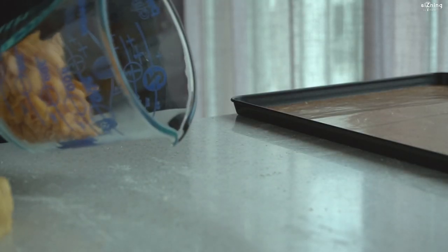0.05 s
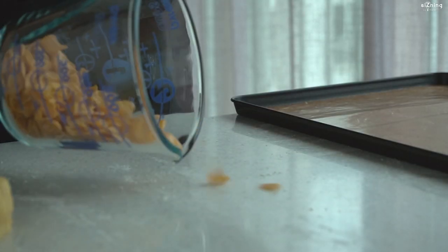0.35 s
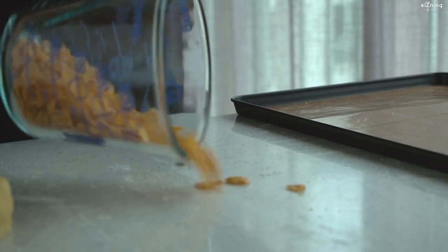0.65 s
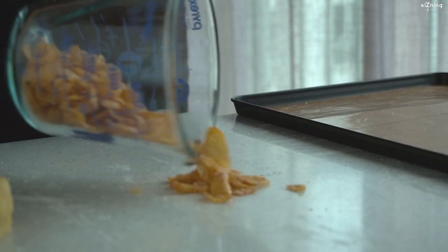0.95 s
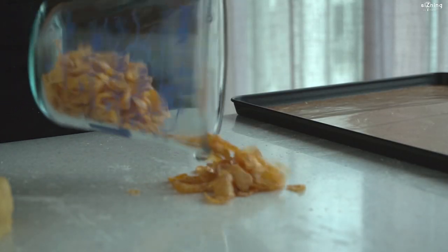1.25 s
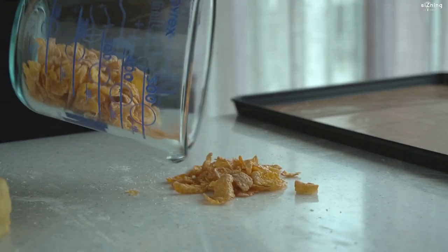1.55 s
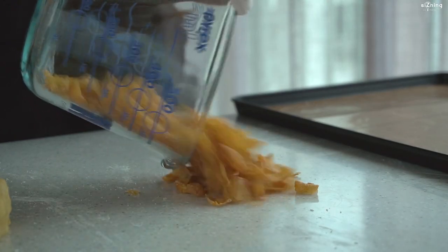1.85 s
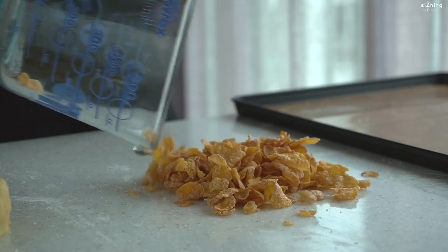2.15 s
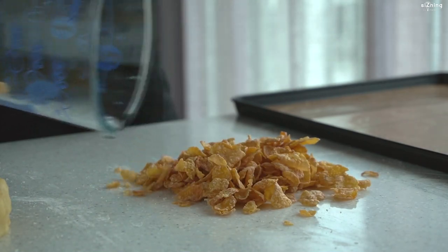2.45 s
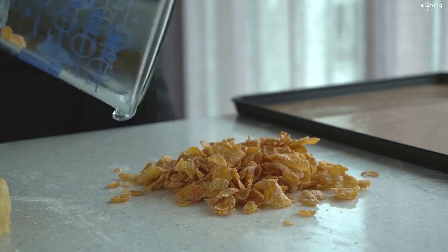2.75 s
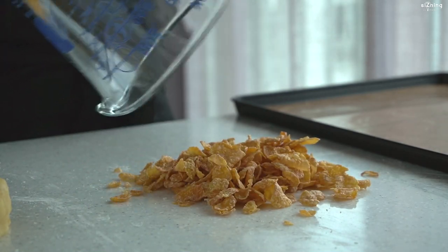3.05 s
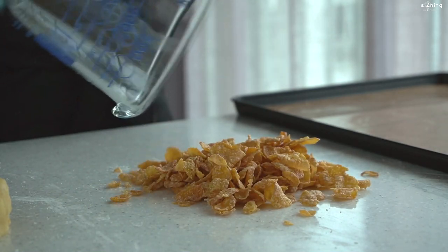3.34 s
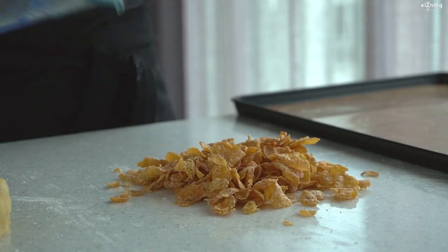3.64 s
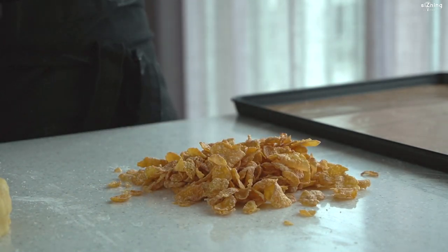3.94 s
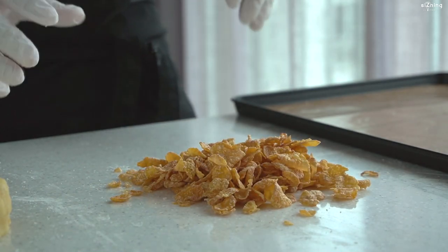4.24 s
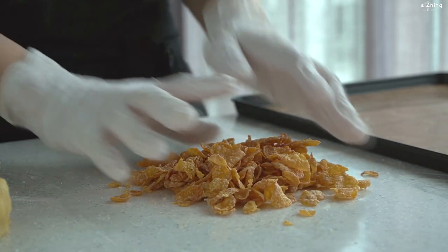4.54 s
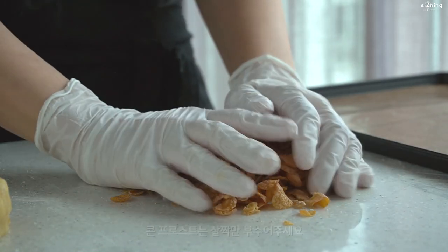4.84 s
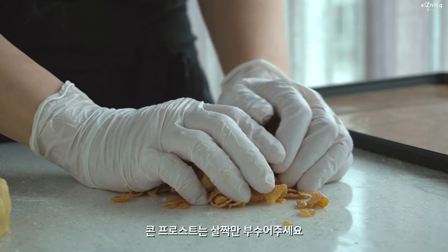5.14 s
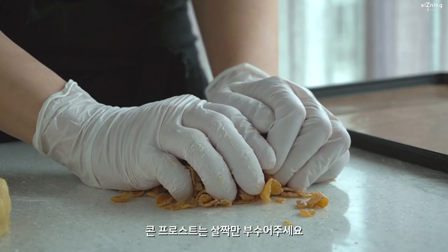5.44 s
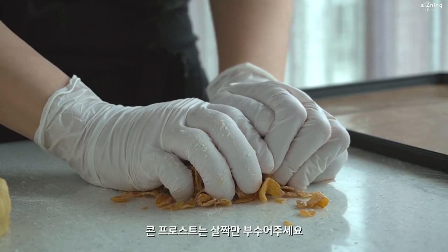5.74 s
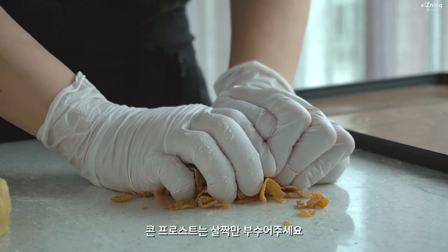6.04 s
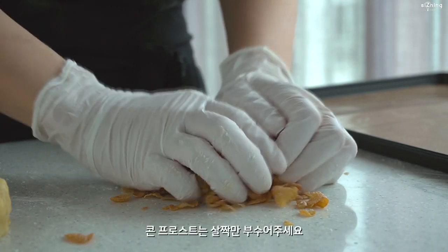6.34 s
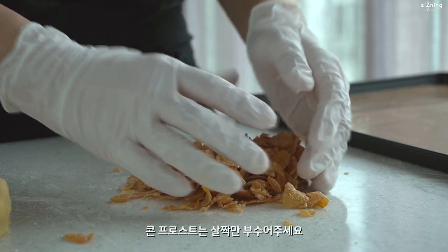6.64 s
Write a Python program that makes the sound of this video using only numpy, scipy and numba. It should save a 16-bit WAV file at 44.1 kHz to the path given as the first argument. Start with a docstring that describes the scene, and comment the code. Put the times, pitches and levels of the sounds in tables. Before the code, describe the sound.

Dry cornflakes trickle from a glass jug onto a stone countertop in bright, tinkling spurts, lightly ringing the glass and ending in a fuller rush. A few last flakes bounce onto the heap. After a pause, gloved hands press down, and fine crackling builds into dense, slightly hollow crunching with soft thuds, then eases off. The sound is close, in a quiet, humming kitchen.

```python
"""Cornflakes tinkle and rush out of a glass jug onto a stone countertop; then two gloved hands cup the
heap and crush it. Every contact or fracture is the tiny ring of a brittle flake. Sliding flakes ring
the glass; breaking ones ring the air pocket under the palms and thud into the counter.
Close stereo perspective in a quiet, humming kitchen."""
import sys
import numpy as np
from scipy import signal
from scipy.fft import rfft, irfft, next_fast_len
from scipy.io import wavfile
from scipy.ndimage import uniform_filter1d
from numba import njit

SR = 44100
rng = np.random.default_rng(int(sys.argv[2]) if len(sys.argv) > 2 else 0)


def int16_out(signal):
    """Quantize to a 16-bit WAV file."""
    q = np.round(np.clip(np.atleast_2d(signal).T, -1, 1) * 32767)
    wavfile.write(sys.argv[1], SR, q.astype(np.int16))


N = 299439
T = np.arange(N) / SR
TOP_HZ = 16000


def undb(db):
    """Decibels to gain."""
    return 10 ** (np.asarray(db) / 20)


def fader(points):
    """Gain that follows (time_s, level_db) points; silent outside their span."""
    return undb(np.interp(T, *np.transpose(points), left=-140, right=-140))


def swells(table, fall_db_per_s):
    """Gain of overlapping events that each build up, hold and die away; their powers add."""
    power = 0
    for peak_s, rise_s, hold_s, db in table:
        attack = np.exp(np.minimum(T - peak_s, 0) / max(rise_s, .001))
        fall_db = fall_db_per_s * np.clip(T - peak_s - hold_s, 0, 1)
        power = power + (attack * undb(db - fall_db)) ** 2
    return np.sqrt(power)


def unit(x):
    """Scale to rms 1."""
    return x / np.sqrt(np.mean(x ** 2))


def colour(x, points, size=1024):
    """Minimum-phase EQ shaped by (freq_hz, gain_db) points; white noise keeps its power."""
    hz, db = np.transpose(points)
    grid_hz = np.maximum(np.fft.rfftfreq(size, 1 / SR), 1)
    gain = undb(np.interp(np.log(grid_hz), np.log(hz), db))
    cepstrum = irfft(np.log(gain))
    cepstrum[1:size // 2] *= 2
    cepstrum[size // 2 + 1:] = 0
    taps = irfft(np.exp(rfft(cepstrum)))
    return signal.oaconvolve(x, taps[None] / np.linalg.norm(taps))[:, :N]


def ring(x, hz, width_hz):
    """One resonance, steady or gliding, as a complex signal."""
    radius = np.exp(-np.pi * width_hz / SR)
    gain = [np.sqrt(2 * (1 - radius ** 2))]
    if np.ndim(hz) == 0:
        return signal.lfilter(gain, [1, -radius * np.exp(2j * np.pi * hz / SR)], x)
    turn = np.exp(2j * np.pi * np.cumsum(hz) / SR)
    return turn * signal.lfilter(gain, [1, -radius], x / turn)


def steep_ring(x, hz, stage_width_hz):
    """Two equal resonances in series, for steeper skirts; rms 1."""
    once = ring(x, hz, stage_width_hz).real
    return unit(ring(once, hz, stage_width_hz).real)


def body(x, modes):
    """A set of resonances struck together, at the level of their drive."""
    return unit(sum(undb(db) * ring(x, hz, width).real for hz, width, db in modes)) * np.std(x)


@njit
def add_rings(out, start, omega, decay, size, lag):
    """Add damped sines to both channels, timed in samples; the left one lags by lag radians."""
    for k in range(len(start)):
        pole = np.exp(1j * omega[k] - 1 / decay[k])
        for c in range(2):
            z = size[k, c] * 2 / np.sqrt(decay[k]) * np.exp(1j * lag[k] * (c - .5))
            for i in range(start[k], min(start[k] + int(6 * decay[k]), out.shape[1])):
                out[c, i] += z.imag
                z *= pole


# Stereo image of a flake's ring: pitch_hz, left_lag_rad, scatter_rad, left_minus_right_db
FLAKE_IMAGE = [(0, 0.37, .05, 7.5), (2500, 0, 0.038, -0.5), (4200, 0, 0.067, -0.1), (5500, 0, 0.056, 1.5),
               (7600, 0.4, 1.4, 4), (9400, 0.15, 0.2, -2.5), (11500, 0.8, 0.3, 3), (14000, 0.9, 0.78, 0)]
def flakes(times, sizes, hz=None, ring_s=.00045, ring_spread=1.0):
    """Each brittle flake rings with its own pitch, damping and place; sizes are root energies."""
    damping, place, side = rng.standard_normal((len(times), 3)).T
    if hz is None:
        hz = rng.uniform(0, TOP_HZ, len(times))
    decay = SR * ring_s * np.exp(ring_spread * np.clip(damping, -2, 2))
    image_hz, *columns = np.transpose(FLAKE_IMAGE)
    lag, scatter, left_db = (np.interp(hz, image_hz, column) for column in columns)
    pan = undb(np.outer(left_db + 4 * side * scatter, [.5, -.5]))
    start = np.clip(times * SR, 0, N - 1).astype(np.int64)
    out = np.zeros((2, N))
    add_rings(out, start, 2 * np.pi * hz / SR, decay, sizes[:, None] * pan, lag + scatter * place)
    return out


def rustle(per_s, scatter_db, ring_s, scrape_s, dulling=0, edges=3, free_ring_hz=10000):
    """A bed of random contacts, each a short scrape over several edges; held steady at rms 1."""
    when, chance = rng.random((int(per_s * N / SR), 2)).T
    sizes = undb(-scatter_db * np.log(chance + .004))
    times = when[:, None] * N / SR + scrape_s * rng.exponential(1, (len(when), edges))
    hz = rng.uniform(0, TOP_HZ, times.size)
    # big, low flakes lie against their neighbours, which cuts their ring short
    freedom = np.clip(hz / free_ring_hz, .3, 1) ** dulling
    contacts = flakes(times.ravel(), np.repeat(sizes, edges), hz, ring_s=ring_s * freedom)
    power = uniform_filter1d(np.mean(contacts ** 2, axis=0), size=1500)
    return contacts / np.sqrt(power + 1e-12)


# Trickle while the jug is tipped: time_s, level_db
TRICKLE_FADER = [(0, -41), (.08, -37.5), (.52, -36.5), (.54, -47.5), (.66, -37), (1.0, -42.5),
                 (1.75, -37.5), (2.22, -39), (2.31, -60), (2.43, -64.5), (2.76, -76)]
# Batches give way, slide out and settle: peak_s, rise_s, hold_s, level_db
SLIDE_CUES = [(.14, 0.029, 0.012, -32), (.18, .008, 0.068, -28.5), (.36, 0.015, 0.011, -35.5),
              (.69, 0.03, 0.018, -27.5), (.81, .02, 0.047, -35.5), (.945, 0.03, 0.0059, -33),
              (1.04, 0.0066, 0.057, -35.5), (1.2, 0.014, 0.017, -30.5), (1.305, 0.0043, 0.016, -33.5),
              (1.545, .02, 0.061, -38.5), (1.622, 0.015, 0.023, -34), (1.82, 0.031, .18, -24),
              (2.06, 0.034, 0.012, -29), (2.18, .02, 0.011, -32.5), (3.08, 0.024, 0.026, -58)]
# The last flakes bounce on the heap, scattering crumbs: peak_s, rise_s, hold_s, level_db
BOUNCE_CUES = [(3.245, 0.0043, .008, -35.5), (3.288, 0.0062, 0.0093, -38.5), (3.35, .02, .01, -53)]
# The jug's lip rubs the counter and rings the glass: peak_s, rise_s, hold_s, level_db
LIP_RUB_CUES = [(.17, .03, .12, -37), (1.47, .03, 0.19, -40)]
# Ring of the glass jug: pitch_hz, width_hz, gain_db
JUG_MODES = [(738, 105, -2), (1328, 70, -0.5), (1760, 60, -3.5), (2278, 61, 1), (3680, 40, -5),
             (4900, 19, 3), (6648, 30, -24), (7050, 20, -8)]
# Thin, bright tone of loose flakes: freq_hz, gain_db
LOOSE_EQ = [(150, -36), (350, -15), (500, -24), (750, -19), (950, -19.5), (1900, -16), (2800, -12.5),
            (3700, -7.5), (5800, -6), (7400, -9.5), (9600, -2), (11200, -2.5), (13200, -7.5), (16000, -17)]
def pour(glass_db=-16.5, patter_db=-31):
    """Flakes tinkle one by one or rush together, knock the glass and patter on the counter."""
    moving = np.hypot(fader(TRICKLE_FADER), swells(SLIDE_CUES, fall_db_per_s=162))
    loudness = undb(-1) * moving + swells(BOUNCE_CUES, fall_db_per_s=450)
    rush = np.clip(loudness / undb(-27), .45, .9)  # a faster flow has many more contacts
    tinkle = rustle(per_s=900, scatter_db=2.2, ring_s=.0016, scrape_s=.0016, dulling=2)
    slide = rustle(per_s=7000, scatter_db=.5, ring_s=.00074, scrape_s=.002, dulling=1)
    flow = loudness * (np.sqrt(1 - rush) * tinkle + np.sqrt(rush) * slide)
    hits = rng.random(N) < 90 / SR  # about 90 a second
    knocks = unit(hits * undb(3 * rng.standard_normal(N)))
    in_jug = np.minimum(loudness, undb(-37)) * np.interp(T, [1.7, 1.9], [1, .3])
    on_glass = np.hypot(in_jug, swells(LIP_RUB_CUES, fall_db_per_s=162))
    patter = counter_thud(undb(patter_db) * moving * rng.standard_normal(N))
    return colour(flow, LOOSE_EQ) + patter + undb(glass_db) * body(knocks * on_glass, JUG_MODES)


# Low body of the stone slab: pitch_hz, width_hz, gain_db, left_lag_rad, left_minus_right_db
SLAB_MODES = [(100, 10, 0, 2.95, -0.5), (155.5, 13, -13.5, .4, -3), (199, 37, 2, 1.4, 5.5),
              (236, 22, -7.5, 1.76, -3), (293, 36, -13.5, .3, -8), (336, 27, -11.5, 0.55, -6),
              (386, 51, -16, 2.2, 0), (648, 180, -7.5, 0.68, 0.5)]
def counter_thud(force):
    """The slab's modes share the force; each has its own stereo phase and balance."""
    half = np.array([[.5], [-.5]])
    thud = 0
    for hz, width, db, lag, left_db in SLAB_MODES:
        mode = unit((ring(force, hz, width) * np.exp(-1j * lag * half)).real)
        thud = thud + undb(db + left_db * half) * mode
    band = signal.butter(2, [85, 900], "band", fs=SR, output="sos")
    return unit(signal.sosfilt(band, thud)) * np.std(force)


# Dark tone of the ventilation: freq_hz, gain_db
VENT_EQ = [(18, -1), (30, 0), (60, -3), (95, -15), (125, -16), (170, -13), (280, -16.5), (400, -17.5),
           (530, -18.5), (750, -24), (1000, -26.5), (2400, -33), (10000, -39), (16000, -42.5)]
# Bands of the appliance drone: pitch_hz, stage_half_width_hz, level_db
DRONE_BANDS = [(48.3, 7.4, -60), (85.57, 1.85, -57.5), (167.2, 7.7, -64.5), (224, 18.5, -62.5),
               (351.2, 30, -61)]
# The drone slowly swells and recedes: time_s, gain_db
DRONE_FADER = [(0, -4), (1.3, -2.5), (2.1, 0.5), (3.1, -0.5), (4.4, 1.5), (6.8, -2.5)]
def kitchen_hum(vent_db=-50, side_db=-3):
    """Room tone: soft ventilation noise, a touch wider in the treble, and a droning appliance."""
    mid, side = colour(rng.standard_normal((2, N)), VENT_EQ, size=8192)
    side = side - .046 * signal.sosfilt(signal.butter(1, 700, fs=SR, output="sos"), side)
    vent = mid + undb(side_db) * side * np.array([[1], [-1]])
    noise = rng.standard_normal(N)
    drone = sum(undb(db) * steep_ring(noise, hz, 2 * half_width) for hz, half_width, db in DRONE_BANDS)
    return undb(vent_db) * vent + drone * fader(DRONE_FADER)


# Single flakes strike or snap in the foreground; a glove snaps once: start_s, level_db, pitch_hz
TICK_CUES = [(0.066, -31.5, 9400), (0.104, -27, 10460), (.138, -27, 10600), (.179, -22, 10100),
             (.2023, -22, 10800), (.266, -25, 10500), (.323, -28.5, 9600), (.438, -30, 10000),
             (0.4847, -34, 11200), (.686, -34, 9500), (0.704, -27, 11800), (0.793, -29, 11800),
             (.816, -28, 11500), (0.9108, -26, 10800), (0.945, -27.5, 10600), (.9538, -26.5, 8330),
             (1.0362, -30.5, 10300), (1.183, -24.5, 11800), (1.2032, -30, 10200), (1.3023, -28, 8370),
             (1.338, -31, 10500), (1.4885, -35, 11500), (1.514, -28.5, 9000), (1.539, -29, 6640),
             (1.5484, -27, 14500), (1.6326, -31, 12100), (1.6454, -31, 12800), (1.777, -30.5, 10600),
             (2.054, -28.5, 6440), (2.267, -37, 11100), (2.3504, -45, 12800), (2.456, -54, 11500),
             (2.4875, -40, 10600), (2.4968, -38, 5770), (2.518, -39.5, 5570), (2.591, -44.5, 5960),
             (2.648, -53, 8750), (2.6934, -52, 4700), (3.1085, -50, 9400), (3.2238, -36, 11200),
             (3.238, -25, 5620), (3.251, -26.5, 10000), (3.29, -30.5, 12300), (3.301, -35.5, 5700),
             (3.646, -53.5, 5500), (4.432, -48.5, 4400), (4.652, -33, 11230), (4.748, -33, 11400),
             (5.5233, -26, 7070), (5.6937, -19, 10400), (6.194, -35, 11500), (6.251, -38, 9450),
             (6.6076, -40, 10500), (6.7606, -39.5, 8300), (6.775, -41, 10600)]
# Clack of a big flake landing: pitch_hz, width_hz, gain_db
CLACK_MODES = [(1125, 480, -5), (1810, 360, -11), (3600, 250, -1.5), (4400, 400, 0)]
def ticks(edge_spread_hz=3000, chatter_s=.0012, lead_s=.0012, contacts=24):
    """Each tick is a chatter of rough edges and one clear ring; big, low ones also clack."""
    start_s, db, hz = np.transpose(TICK_CUES)
    size = undb(db) * np.sqrt(SR * .003)
    times = (start_s[:, None] - lead_s + chatter_s * rng.gamma(2, 1, (len(hz), contacts))).ravel()
    contact_size = np.repeat(size, contacts) / np.sqrt(contacts)
    # the edges ring around the tick's own pitch, so small flakes stay thin and bright
    edges_hz = np.repeat(hz, contacts) + edge_spread_hz * rng.standard_normal(len(times))
    chatter = flakes(times, contact_size, np.clip(edges_hz, 1500, TOP_HZ), ring_s=.0003)
    bulk = np.clip((10000 - hz) / 4500, 0, 1)
    knocks = flakes(times, contact_size * np.repeat(bulk, contacts), ring_s=.00025)
    tone = flakes(start_s, size, hz, ring_s=.0021, ring_spread=.48)
    return undb(-3) * (tone + colour(chatter, LOOSE_EQ)) + undb(-9) * body(knocks, CLACK_MODES)


# Sub rumble as the counter rocks under jug and hands: peak_s, rise_s, hold_s, level_db
ROCK_CUES = [(.92, .1, .08, -37.5), (5.52, 0.16, .3, -39.5), (6.13, .12, 0.03, -26)]
def counter_rocking(hz=26, side_db=-1):
    """The counter sways deep down and carries that to the microphone stand."""
    band = signal.butter(3, [hz * .69, hz * 1.255], "band", fs=SR, output="sos")
    rumble = signal.sosfilt(band, rng.standard_normal((2, N)))
    sway = signal.hilbert(rumble, next_fast_len(N))[:, :N]
    mid, side = unit(sway.real / np.sqrt(abs(sway)))  # 2:1 compression evens the sway
    stereo = (mid + undb(side_db) * side * np.array([[1], [-1]])) / np.sqrt(2)
    return swells(ROCK_CUES, fall_db_per_s=83) * stereo


def swishes(skid_db=-54.5, glove_db=-60):
    """Two faint swishes: flakes skid back down the glass, and rubber gloves reach for the heap."""
    skid = np.interp(T, [2.49, 2.51, 2.6, 2.68, 2.73, 2.77], [.33, .9, .7, .58, .77, .031])
    reach = np.interp(T, [4.35, 4.45, 4.56, 4.65], [0, 1, 1, 0])
    swish_eq = [(1200, -5.5), (3500, -4), (5000, -6), (6100, -3), (8000, -14.5)]
    swish = colour(rng.standard_normal((2, N)), swish_eq)
    return (undb(skid_db) * skid + undb(glove_db) * reach) * swish


# How hard the palms bear down: time_s, force_0_to_1
PALM_FORCE = [(4.62, 0), (5.0, 0.38), (5.4, 0.62), (5.7, 0.77), (5.97, 1), (6.12, 0.94), (6.19, 0.56),
              (6.45, 0.18), (6.79, 0)]
# The heap shifts and crumbles: peak_s, rise_s, hold_s, level_db, counter_push_db
CRUMBLE_CUES = [(4.655, .003, .008, -48, 0), (4.76, .02, 0.063, -42.5, 7),
                (5.073, 0.092, 0.059, -32.5, -6.5), (5.172, 0.007, .008, -35.5, -4),
                (5.279, 0.051, 0.014, -35.5, -1), (5.34, 0.0066, 0.0047, -33, 1),
                (5.451, 0.018, 0.01, -32, 3), (5.59, .015, 0.052, -33, 0.5),
                (5.718, 0.026, 0.021, -25.5, 3.5), (5.812, 0.01, 0.0049, -26, 4.5),
                (5.958, 0.03, 0.0063, -23.5, 1.5), (6.015, 0.0093, 0.033, -20, -0.5),
                (6.092, 0.027, 0.012, -22, 3.5), (6.39, 0.074, 0.06, -43.5, 3),
                (6.61, 0.045, .01, -43.5, 0), (6.758, 0.023, .015, -43, 0)]
# The hollow under the palms sinks in pitch as they close over the heap: time_s, pitch_hz
POCKET_GLIDE = [(4.9, 1080), (5.35, 1135), (5.6, 1040), (5.85, 1014), (6.0, 1014), (6.2, 1004)]
# Fuller midrange of flakes under the gloves: freq_hz, gain_db
PRESSED_EQ = [(300, -17), (800, -22), (1500, -7.5), (2400, -7), (3300, -4.5), (3650, -2.5), (4300, -4),
              (5500, -2.5), (7400, -6.5), (9600, -2), (11200, -2.5), (13200, -8.5), (16000, -16.5)]
def crush(touch_s=4.63, close_s=.087, fall_db_per_s=455):
    """Fine crackle and collapses; the harder the palms press, the more air pocket and counter sound."""
    force = np.interp(T, *np.transpose(PALM_FORCE))
    grip = np.clip((T - touch_s) / close_s, 0, 1)
    steady = grip * undb(-48.5 + 11 * force)
    crumbles = swells([cue[:-1] for cue in CRUMBLE_CUES], fall_db_per_s)
    breaking = np.hypot(steady, crumbles)
    shoves = swells([(*timing, db + push_db) for *timing, db, push_db in CRUMBLE_CUES], fall_db_per_s)
    fractures, air_push, counter_push = collapses()
    crackle = rustle(per_s=4200, scatter_db=-.4, ring_s=.00041, scrape_s=.001)
    crunch = undb(-1) * colour(crackle * breaking + fractures, PRESSED_EQ)
    air = undb(-15.5 + 7.5 * force) * breaking * rng.standard_normal(N) + undb(-4) * air_push
    pocket_hz = np.interp(T, *np.transpose(POCKET_GLIDE))
    hollow = steep_ring(air, pocket_hz, stage_width_hz=360) * np.std(air)
    load = np.hypot(undb(3) * steady, shoves) * rng.standard_normal(N) + undb(-6) * counter_push
    thud = counter_thud(undb(-23.5 + 22 * force) * load)
    return crunch + hollow * undb([[.6], [-.6]]) + thud


# Big cracks as layers of flakes cave in: start_s, level_db, spread_s, pocket_offset_db
COLLAPSE_CUES = [(5.27, -30, 0.002, -14), (5.332, -27, .0016, -4), (5.373, -31, 0.0014, -2),
                 (5.4139, -24, .0006, -7.5), (5.44, -28, 0.0019, -22), (5.452, -23.5, .002, -24),
                 (5.5227, -30.5, .0012, -7), (5.533, -32, .0012, -25), (5.552, -28.5, .0008, -2),
                 (5.579, -26, .0015, -8), (5.593, -27.5, 0.0019, -0.5), (5.6244, -28, .002, -18),
                 (5.6663, -24, .0012, -17), (5.685, -22, .0009, -6.5), (5.72, -19, 0.0015, -4),
                 (5.7456, -20, .0018, 1), (5.767, -28, .002, -17), (5.821, -24.5, 0.0017, -10),
                 (5.8517, -27, 0.002, 0), (5.877, -20.5, 0.0013, -7), (5.893, -26.5, 0.0016, -22),
                 (5.91, -19.5, 0.0017, 0.5), (5.9506, -20.5, .0018, -9), (6.053, -19.5, 0.002, -2.5)]
def collapses(lead_s=.002, late_share=.25, late_s=.0074, count=70):
    """Avalanches of fractures; returns their rings and their kicks to air pocket and counter."""
    start_s, db, spread_s, pocket_db = np.transpose(COLLAPSE_CUES)
    times = start_s[:, None] - lead_s + spread_s[:, None] * rng.gamma(2, 1, (len(db), count))
    late = rng.random(times.shape) < late_share  # some crumbs give way a little later
    times = (times + late * late_s * rng.exponential(1, times.shape)).ravel()
    size = undb(db) * np.sqrt(SR * .007)
    fractures = flakes(times, np.repeat(size, count) / np.sqrt(count), ring_s=.00024)
    # the largest piece rings on with a low and a high bending mode
    for low_hz, high_hz in [(3400, 6100), (8500, 11500)]:
        mode_hz = rng.uniform(low_hz, high_hz, len(db))
        fractures += flakes(start_s + lead_s, size * undb(-7) / 2, mode_hz, ring_s=.004, ring_spread=.28)
    air_push, counter_push = np.zeros((2, N))
    for push, strength in [(air_push, size * undb(pocket_db)), (counter_push, size)]:
        kicks = np.repeat(strength, count) * rng.choice([-1, 1], times.size) / np.sqrt(count)
        np.add.at(push, (times * SR).astype(int), kicks)
    return fractures, air_push, counter_push


def room(x, early_db=-14, early_s=.0044, tail_db=-12, t60_s=.31, length=22050):
    """Close echoes off counter and jug, then the kitchen's short tail, partly shared by both sides."""
    t = T[:length]
    early = rng.standard_normal(length) * np.exp(-t / early_s) * (t > .001)
    diffuse = rng.standard_normal((2, length)) + 1.4 * rng.standard_normal(length)
    tail = diffuse * undb(-60 * t / t60_s) * (t > .006)
    echoes = undb(early_db) * early / np.linalg.norm(early)
    echoes = echoes + undb(tail_db) * tail / np.linalg.norm(tail[0])
    return x + signal.oaconvolve(x, echoes, axes=1)[:, :N]


def scene():
    """The pour, then the crush, over counter rumble and room tone."""
    foley = pour() + ticks() + crush() + swishes()
    return room(foley) + counter_rocking() + kitchen_hum()


def record(dry):
    """Soft saturation rounds the highest peaks; a steep low-pass cuts the top."""
    lowpass = signal.ellip(10, .2, 80, TOP_HZ, fs=SR, output="sos")
    return signal.sosfilt(lowpass, np.tanh(1.254 * dry) / 1.338)


dry = scene()
out = record(dry)
int16_out(out)
```